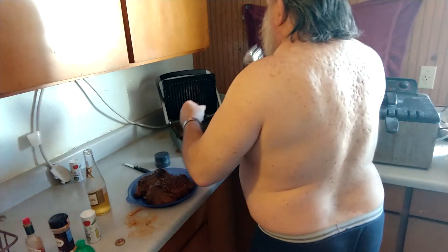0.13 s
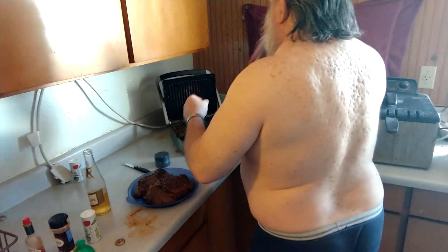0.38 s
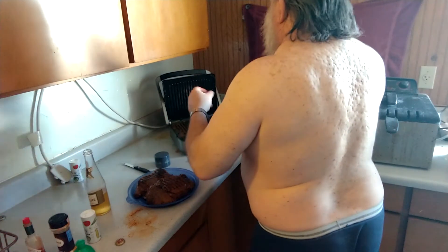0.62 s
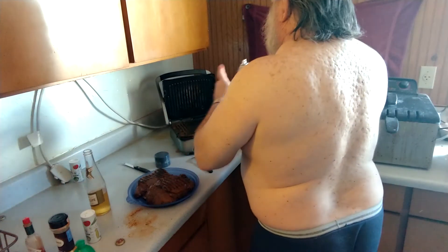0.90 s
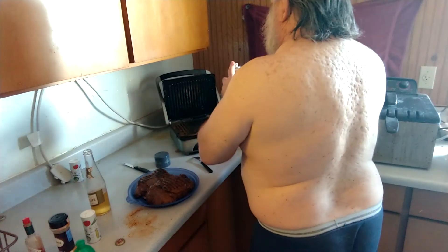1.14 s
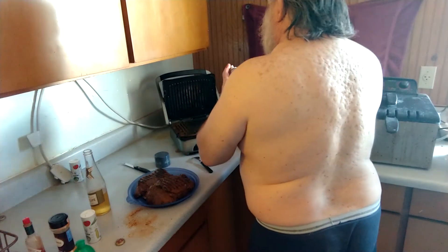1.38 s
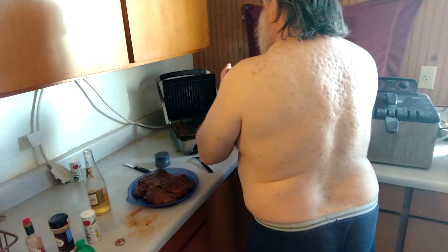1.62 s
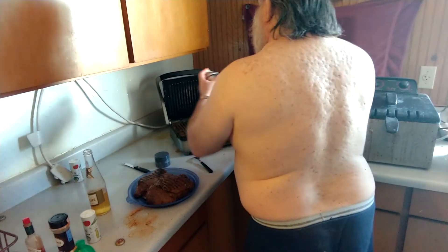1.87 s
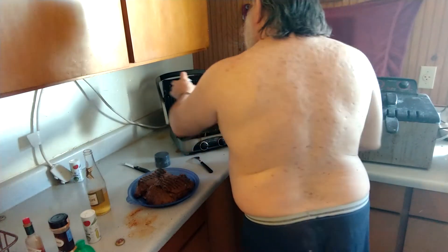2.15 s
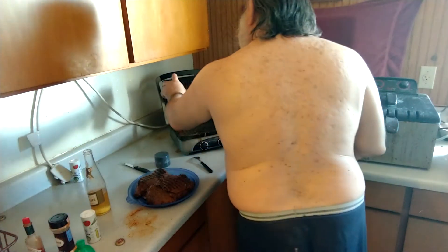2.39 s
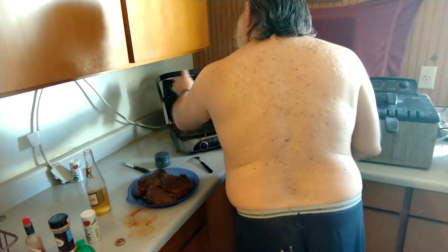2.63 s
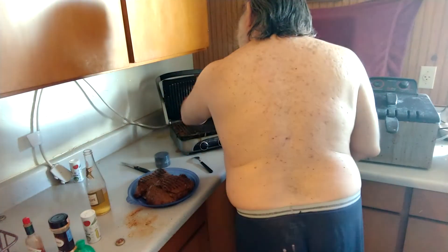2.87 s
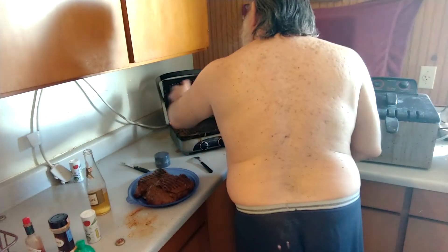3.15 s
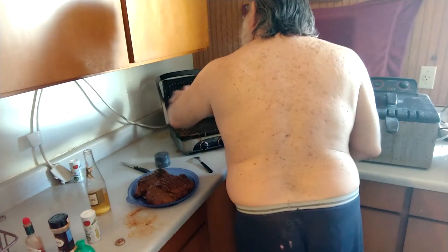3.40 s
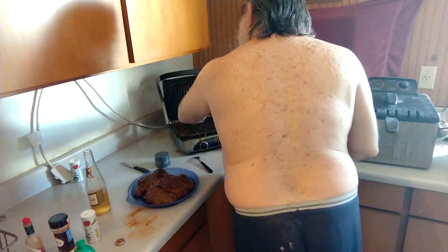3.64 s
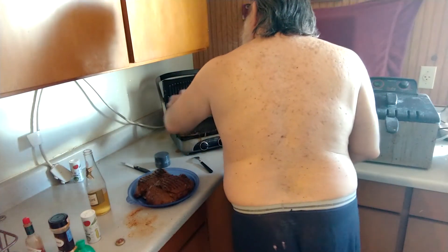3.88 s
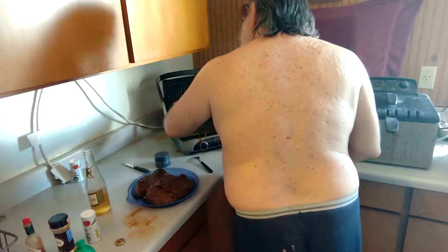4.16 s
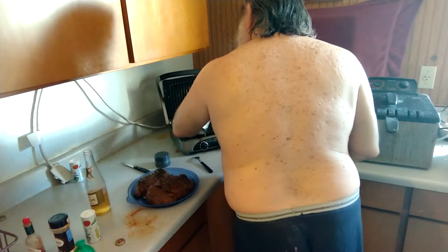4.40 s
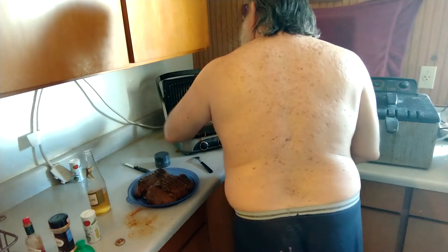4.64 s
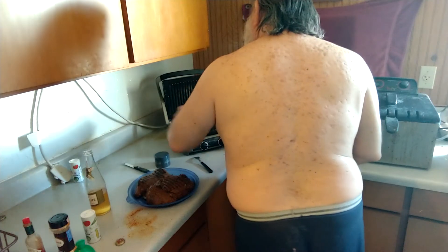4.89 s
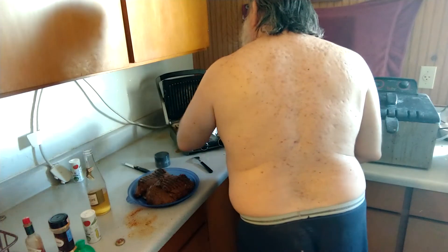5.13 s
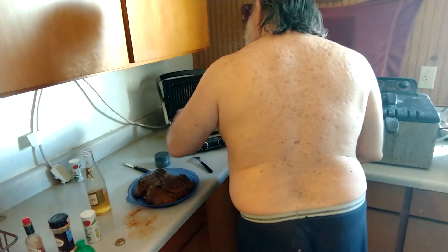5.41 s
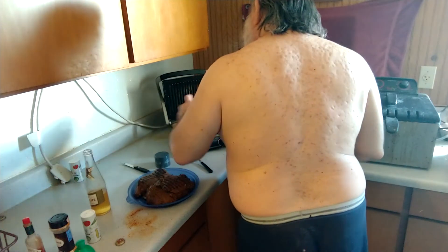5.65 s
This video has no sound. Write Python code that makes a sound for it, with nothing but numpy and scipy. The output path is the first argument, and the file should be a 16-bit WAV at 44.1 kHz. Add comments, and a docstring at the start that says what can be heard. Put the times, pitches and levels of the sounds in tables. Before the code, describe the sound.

Handling swishes, soft knocks and small ticks, a light bump on a metal grill, then one steady bright aerosol spray in a humming kitchen.

```python
"""Aerosol can on a grill plate

Swishes, soft knocks and ticks of handling, bumps on a ribbed metal grill, then a spray onto it in a kitchen.
Spray and rustle are coloured diffuse noise; knocks and bumps ring damped modes; ticks are clicks with noise tails.
A refrigerator hums in sine tones over room tone. Two spaced microphones hear a mostly diffuse field;
the recorder widens the image by subtracting from each side a delayed copy of the other.
"""
import sys
import numpy as np
from scipy import signal
from scipy.fft import rfft, irfft, next_fast_len
from scipy.io import wavfile
from scipy.ndimage import uniform_filter1d, map_coordinates

SR = 44100
rng = np.random.default_rng(int(sys.argv[2]) if len(sys.argv) > 2 else 0)


def volts(x):
    """Linear amplitude factor 10**(x/20) for a level x in dB, scalar or array-like."""
    e = np.asarray(x, float) / 20
    return 10 ** e


def put_to_file(sound):
    """Save the sound as 16-bit audio at rate SR, in the file named by the first command-line argument."""
    columns = np.atleast_2d(sound).T  # one column per channel
    safe = np.clip(columns, -1, 1)
    whole_steps = np.round(safe * 32767)
    wavfile.write(sys.argv[1], SR, whole_steps.astype(np.int16))


N = 254589

# Relative noise spectra [f/Hz, density/dB per Hz]: room, microphone noise, bright and dull rustle
ROOM_SPECTRUM = [(20, 1), (40, -7.5), (55, -1), (100, 1), (200, -2.5), (400, -3), (800, -14.5), (1500, -15),
                 (4000, -53), (16000, -62)]
SELF_NOISE_SPECTRUM = [(20, 1), (40, -8), (100, -2.5), (200, -1), (400, -8), (800, -27), (1600, -53)]
SHEEN_SPECTRUM = [(1200, -14.5), (2000, 0.5), (3200, -1), (6000, 0.5), (9000, -1), (12000, 1.5), (15600, 0),
                  (16500, -4)]
DULL_SPECTRUM = [(200, -15), (350, 0), (700, 3.5), (1300, 1.5), (1800, -6), (2600, -16)]
# Relative spray spectra [f/Hz, density/dB per Hz]: jet body, droplet treble, mist on the plate
JET_SPECTRUM = [(1200, -29.5), (2000, -19.5), (3000, -9.5), (4400, -4), (4900, -6), (5250, -9.5),
                (5700, -6), (6500, -4), (7300, -1.5), (8300, -0.5), (9300, -5.5), (11000, -13),
                (13000, -36)]
FIZZ_SPECTRUM = [(7500, -36), (9300, -8), (10500, 1.5), (12500, 7), (14000, 4.5), (15600, 9), (16500, -19)]
WASH_SPECTRUM = [(250, -35), (450, -10.5), (650, -4.5), (950, 1), (1150, -1), (1350, 0), (1700, -4),
                 (2400, -15), (3200, -19)]
# Refrigerator tones [f/Hz, level/dB before HUM_TRIM_DB]
HUM_TONES = [(118.4, -68.5), (236.9, -63), (468.3, -65), (527.6, -75)]
# Faint appliance whine, resonance applied twice [f/Hz, width/Hz per pass, gain/dB per pass]
WHINE_PEAK = [(8820, 63, 0)]
# Swishes of handling [t/s, hold/s, level/dB]
SWISH_EVENTS = [(-.02, 0.029, -41), (0.083, .08, -48), (0.217, 0.087, -42), (0.408, 0.015, -44.5),
                (0.52, 0.056, -42), (0.688, 0.014, -46), (0.79, 0.034, -43), (1, 0.098, -45),
                (1.324, .01, -50), (1.996, 0.067, -50), (2.182, 0.1, -55), (5.612, 0.025, -45)]
# Fainter rustle between swishes [t/s, level/dB]
FIDGET_LEVEL = [(0, -53.5), (1.15, -48), (1.28, -58), (1.4, -54.5), (1.82, -55), (2.43, -53), (5.6, -53),
                (5.78, -49)]
# Soft knocks [t/s, nominal level/dB, deep modes re level/dB, ring re level/dB, contacts/count]
KNOCK_EVENTS = [(0.259, -44, -8, -28, 2), (.575, -45, -17, -19, 1), (.797, -35, -10, -15, 2),
                (.906, -35.5, 5, -5, 4), (1.004, -47, 2, -9, 2)]
# Hollow body, upper and deep modes [f/Hz, level/dB, T60/s]
CUPBOARD_MODES = [(249.3, 1, 0.14), (289, 6, 0.087), (327.6, -3.5, 0.12), (467, -7.5, 0.091)]
DEEP_MODES = [(91, -7, 0.17), (157, -1, 0.23), (205, 1.5, 0.2)]
# Thin-metal rattle, resonances applied twice [f/Hz, width/Hz per pass, gain/dB per pass]
TIN_PEAKS = [(1215, 50, -3.5), (1402, 140, -4), (2150, 450, -5.5), (4130, 180, -7)]
# Ticks [t/s, tail level/dB, brightness/dB, snap re tail/dB]
TICK_EVENTS = [(.5394, -46, -4, 2), (.6094, -51, 2, 6), (.7522, -52, 5, 8), (.7821, -44, -5, -3),
               (1.3152, -52, 2, 2), (1.3343, -45, -2, 7), (1.3976, -48.5, 6, 8.5), (1.4687, -51, 1, 4),
               (1.5695, -43, -4, 2), (1.6994, -53.5, -7, 0), (1.7873, -53.5, 9, -1), (1.857, -51, 4, 8),
               (1.886, -44, -5, -7), (1.936, -56, 1, 14), (1.956, -54, 8.5, 9.5), (2.006, -50, -18, 4),
               (2.101, -57, -6, 6), (2.144, -44.5, -3, -8), (2.2765, -53.5, -3, 9), (2.312, -43.5, -3, 6.5)]
# Bumps against the grill [t/s, nominal level/dB]
BUMP_EVENTS = [(2.004, -48.5), (2.03, -45), (2.059, -49), (2.156, -45), (2.177, -45), (2.212, -42),
               (2.224, -41.5), (2.234, -36.5), (2.261, -42), (2.279, -39), (2.291, -38.5), (2.312, -40),
               (2.335, -50), (5.674, -45), (5.689, -51), (5.723, -51)]
# Grill modes [f/Hz, level/dB, T60/s]
GRILL_MODES = [(307, 2, 0.055), (372, -7.5, 0.091), (460, -2.5, 0.092), (590, -3, 0.064), (724, -4, 0.13),
               (810, -7, 0.061), (953, -10, 0.082), (1230, -2.5, 0.056)]
# Moving can [t/s, nearness to plate/dB, nozzle turn toward microphones/dB]
CAN_SWEEP = [(2.44, -2, 2.5), (2.82, 2.5, -1), (3.1, 0, -0.5), (3.6, 1.5, 0.5), (3.97, 0.5, 1),
             (4.4, 1.5, 1.4), (4.56, 4, -1), (4.75, 0.5, -0.5), (5.15, -0.5, -1.5), (5.4, 1.5, -2),
             (5.62, 2, 0)]
# Jet surges as liquid spits through the nozzle [t/s, added amplitude re flow/dB]
SPIT_EVENTS = [(2.81, -1), (3.957, -9), (4.55, -4), (5.351, 3.5)]
# Likeness at the two microphones [f/Hz, correlation/1]
MIC_CORRELATION = [(100, 1), (500, 0.74), (1000, 0.31), (1500, 0.055), (2200, 0.29), (4000, 0.061)]
# Share of the other side subtracted [f/Hz, share/1]
CROSSFEED_SHARE = [(100, 0.66), (1100, 0.7), (2150, 1), (3200, 0.61), (5200, 0.8), (7000, 0.82),
                   (11000, 0.21), (15500, 0.63)]
# Left port response [f/Hz, gain/dB]
LEFT_PORT_GAIN = [(100, 1.5), (2000, -0.5), (4200, -2), (6400, -2), (9800, -2.5), (12500, -8), (15500, -13)]

SIDES = np.array([[1], [-1]])  # left, right
HUM_TRIM_DB, ROOM_DB, SELF_NOISE_DB, WHINE_DB = 2.5, -56, -61.5, -68
SWISH_RISE_S, SWISH_T60_S, SWISH_DULL_DB, FIDGET_DULL_DB = 0.0096, 0.48, -23.5, -9
SCRAPE_DB, SCRAPE_T60_S = -24.5, 0.34  # level re knock or bump
RUMBLE_DB, RUMBLE_HZ = -10.5, 40  # level re fidget
JUDDER_S, JUDDER_LOSS_DB, LATER_RING_DB = .025, 1, -22  # contact gap, loss per contact, later-ring offset
RING_T60_S = 0.77
TICK_T60_S, SNAP_T60_S, TICK_TOP_DB = 0.15, 0.013, 3.5
CLICK_DB, CLICK_HZ = 17, 4500  # impulse re snap plus brightness, high-pass corner
OPEN_S, SHUT_S = 2.438, 5.62  # valve
OPEN_DB_PER_S, SHUT_DB_PER_S, WASH_STOP_DB_PER_S = 1055, 347, 600
JET_DB, FIZZ_DB, WASH_DB = -35, -30, -54
JET_FOLLOWS_NEAR, JET_FOLLOWS_TURN = 0.14, 0.14  # dB per dB
SPIT_T60_S = 0.083
MIC_SPACING_S, LEFT_LAG_S = 0.0004685, .00003
LEFT_DB, TOP_HZ = -1.5, 15760


def unit(x):
    """Scaled to rms 1."""
    return x / np.sqrt(np.mean(x ** 2) + 1e-20)


def along(points, hz):
    """Interpolates (Hz, value) points on a log-frequency axis."""
    f, v = np.transpose(points)
    return np.interp(np.log(hz + 1), np.log(f + 1), v)


def curves(rows):
    """One value per sample for each column after the time."""
    s, *cols = np.transpose(rows)
    return [np.interp(np.arange(N) / SR, s, c) for c in cols]


def wobble(rate_hz):
    """Smooth random curve, rate_hz knots a second."""
    knots = rng.standard_normal(int(N * rate_hz / SR) + 4)
    return map_coordinates(knots, [np.arange(N) * rate_hz / SR])


def filtered(x, response):
    """x times a complex response of frequency."""
    m = next_fast_len(N + 8192)
    return irfft(rfft(x, m) * response(np.fft.rfftfreq(m, 1 / SR)), m)[..., :N]


def shape(points):
    """Gain of a (Hz, dB) spectrum."""
    return lambda hz: volts(along(points, hz))


def resonances(peaks):
    """Causal sum of (Hz, width Hz, dB) resonances, alternating in sign."""
    def response(f):
        return sum((-1) ** k * volts(db) * 1j * f * w / (c * c - f * f + 1j * f * w)
                   for k, (c, w, db) in enumerate(peaks))
    return response


def twice(peaks):
    """Resonances applied in two passes."""
    return lambda hz: resonances(peaks)(hz) ** 2


def diffuse(colour, patchy_db, drive=1, ripple_db=0):
    """Noise from all sides at two spaced microphones, alike only where waves are long; drive precedes colour."""
    z = signal.stft(rng.standard_normal((2, N)), nperseg=2048, noverlap=1536)[2]

    def uneven(bins, frames):
        chance = rng.standard_normal(z.shape[1:])
        return unit(uniform_filter1d(uniform_filter1d(chance, bins, 0), frames, 1))

    # broad patches and narrow ripple, both drifting by chance
    gain = volts(patchy_db * uneven(30, 7) + ripple_db * uneven(3, 8))
    pair = unit(signal.istft(z * gain, nperseg=2048, noverlap=1536)[1][:, :N])
    level = np.sqrt(np.mean(np.abs(colour(np.linspace(1, SR / 2, num=4000))) ** 2))

    def mid_side(hz):
        angle = np.arccos(np.clip(along(MIC_CORRELATION, hz), -1, 1)) / 2
        return colour(hz) / level * [np.cos(angle), np.sin(angle)]

    mid, side = filtered(pair * drive, mid_side)
    return np.array([mid + side, mid - side])


def decays(times_s, levels_db, t60_s, rise_s):
    """Sum of envelopes that rise quickly and die away, each cut at 0.5 s."""
    out, t = np.zeros(N + SR), np.arange(SR // 2) / SR
    for s, db in zip(times_s, levels_db):
        out[round(s * SR):][:len(t)] += volts(db - 60 * t / t60_s) * (1 - np.exp(-t / rise_s))
    return out[:N]


def struck(times_s, levels_db, modes, rise_s):
    """Each blow rings damped modes at new strengths and phases, a little different on each side."""
    out, t = np.zeros((2, N + SR)), np.arange(SR // 3) / SR
    chances = rng.standard_normal((len(times_s), len(modes), 4))
    for s, db, chance in zip(times_s, levels_db, chances):
        start = round(s * SR)
        for (hz, mode_db, t60_s), (strength, phase, pan, lead) in zip(modes, chance):
            phase_rad = 2 * phase + 0.16 * lead * SIDES
            wave = np.sin(2 * np.pi * hz * t + phase_rad) * (1 - np.exp(-t / rise_s))
            level_db = db + mode_db + 2.1 * strength + 0.87 * pan * SIDES
            out[:, start:start + len(t)] += volts(level_db - 60 * t / t60_s) * wave
    return out[:, :N]


def contacts():
    """Each knock judders in ever weaker contacts: (s, dB, deep dB, ring dB)."""
    return np.transpose([
        (s + k * JUDDER_S, db - k * JUDDER_LOSS_DB, deep_db, ring_db + LATER_RING_DB * (k > 0))
        for s, db, deep_db, ring_db, count in KNOCK_EVENTS for k in range(round(count))])


def refrigerator():
    """Hum tones, slightly unsteady in level and phase, offset in phase between sides."""
    t = np.arange(N) / SR
    hum = 0
    for hz, db in HUM_TONES:
        level = volts(db + HUM_TRIM_DB + 0.69 * wobble(5.01))
        cycles = hz * t + 0.2 * wobble(6) + rng.random()
        hum = hum + level * np.sin(2 * np.pi * cycles + 0.22 * SIDES)
    return hum


def kitchen():
    """Refrigerator, diffuse room tone, faint whine and the microphones' own independent low noise."""
    room = volts(ROOM_DB) * diffuse(shape(ROOM_SPECTRUM), 1.1)
    own = volts(SELF_NOISE_DB) * unit(filtered(rng.standard_normal((2, N)), shape(SELF_NOISE_SPECTRUM)))
    whine = volts(WHINE_DB) * diffuse(twice(WHINE_PEAK), 1.2)
    return refrigerator() + room + own + whine


def rustle():
    """Broad, slightly crackly swishes of things handled; knocks and bumps drag a dull scrape behind them."""
    t = np.arange(N) / SR
    swish = 0
    for s, hold_s, db in SWISH_EVENTS:
        fall_db = 60 * np.maximum(t - s - hold_s, 0) / SWISH_T60_S
        swish = swish + volts(db - fall_db) / (1 + np.exp(np.clip((s - t) / SWISH_RISE_S, -50, 50)))
    fidget = volts(curves(FIDGET_LEVEL)[0])
    s, db = np.hstack([contacts()[:2], np.transpose(BUMP_EVENTS)])
    scrape = decays(s, db + SCRAPE_DB, SCRAPE_T60_S, .008)
    dull = volts(SWISH_DULL_DB) * swish + volts(FIDGET_DULL_DB) * fidget + scrape
    crackle = unit(volts(1.44 * wobble(40) + 0.54 * wobble(600)))
    bright_noise = np.hypot(swish, fidget) * diffuse(shape(SHEEN_SPECTRUM), 1.7, crackle, ripple_db=2.0)
    dull_noise = dull * diffuse(shape(DULL_SPECTRUM), 1.9, ripple_db=4.0)
    # probably steps or leaning on the counter; ends as the valve opens
    rumble = unit(filtered(rng.standard_normal((2, N)), twice([(RUMBLE_HZ, 18, 0)])))
    return volts(RUMBLE_DB) * fidget * rumble * (t < OPEN_S) + bright_noise + dull_noise


def knocks():
    """Soft blows ring a hollow body's modes and rattle thin metal as resonant noise."""
    s, db, deep_db, ring_db = contacts()
    thud = struck(s, db, CUPBOARD_MODES, 0.0046) + struck(s, db + deep_db, DEEP_MODES, 0.0035)
    return thud + diffuse(twice(TIN_PEAKS), .3, decays(s, db + ring_db, RING_T60_S, 0.0023))


def ticks():
    """Direct click at the right microphone, a snap of a millisecond or two, a short tail from the walls."""
    s, db, bright_db, snap_db = np.transpose(TICK_EVENTS)
    sheen = shape(SHEEN_SPECTRUM)

    def burst(level_db):
        snap = decays(s, level_db + snap_db, SNAP_T60_S, 0.00029)
        return snap + decays(s, level_db, TICK_T60_S, 0.0017)

    def body_colour(hz):
        return sheen(hz) / (1 + (hz / 8500) ** 6) / (1 + (3000 / (hz + 1)) ** 4)

    def top_colour(hz):
        return sheen(hz) / (1 + (9500 / (hz + 1)) ** 6)

    body = diffuse(body_colour, 4.3, burst(db))
    top = diffuse(top_colour, 2.6, burst(db + bright_db + TICK_TOP_DB))
    direct = np.zeros(N)
    direct[np.round(s * SR).astype(int)] = volts(db + bright_db + snap_db + CLICK_DB)
    click = filtered(direct, lambda hz: (1j * hz / (CLICK_HZ + 1j * hz)) ** 2)
    return body + top + click * [[0], [1]]


def bumps():
    """Hand and can touch the grill, which answers in its low modes."""
    s, db = np.transpose(BUMP_EVENTS)
    return struck(s, db, GRILL_MODES, 0.0025)


def spray():
    """Turbulent jet hiss, droplets that spit in the treble, a low wash where the mist hits the plate."""
    t = np.arange(N) / SR
    near_db, turn_db = curves(CAN_SWEEP)
    before_s, after_s = np.maximum(OPEN_S - t, 0), np.maximum(t - SHUT_S, 0)
    opening_db = -OPEN_DB_PER_S * before_s
    valve_db = opening_db - SHUT_DB_PER_S * after_s
    jet_db = JET_DB + valve_db + JET_FOLLOWS_NEAR * near_db + JET_FOLLOWS_TURN * turn_db
    fizz_db = FIZZ_DB + valve_db + turn_db
    wash_db = WASH_DB + near_db + opening_db - WASH_STOP_DB_PER_S * after_s
    flutter_db = 0.37 * wobble(14)  # unsteady valve flow
    droplets = unit(volts(0.55 * wobble(3000) + 0.45 * wobble(150)))
    jet = volts(jet_db + flutter_db) * diffuse(shape(JET_SPECTRUM), 1.0, ripple_db=3.5)
    fizz = volts(fizz_db + flutter_db) * diffuse(shape(FIZZ_SPECTRUM), 0.8, droplets, ripple_db=4.0)
    wash = volts(wash_db) * diffuse(shape(WASH_SPECTRUM), 0.5, ripple_db=3.5)
    spit_s, spit_db = np.transpose(SPIT_EVENTS)
    surge = 1 + decays(spit_s, spit_db, SPIT_T60_S, 0.006)
    return (jet + fizz) * surge + wash


def scene():
    """Everything the two microphones receive."""
    return kitchen() + rustle() + knocks() + ticks() + bumps() + spray()


def low_pass(x):
    """Removes everything above the highest recorded frequency."""
    return signal.sosfilt(signal.butter(12, 17100, fs=SR, output="sos"), x)


def record(dry):
    """Each side loses a delayed share of the other; the left port is weaker, duller and slightly late."""
    def cross(hz):
        return along(CROSSFEED_SHARE, hz) * np.exp(-2j * np.pi * hz * MIC_SPACING_S)

    def left_port(hz):
        return shape(LEFT_PORT_GAIN)(hz) * np.exp(-2j * np.pi * hz * LEFT_LAG_S)

    ports = filtered(dry * volts([[LEFT_DB], [0]]), lambda hz: hz < TOP_HZ)
    left, right = ports - filtered(ports[::-1], cross)
    mix = np.array([filtered(left, left_port), right])
    return low_pass(mix)


dry = scene()
out = record(dry)
put_to_file(out)
```